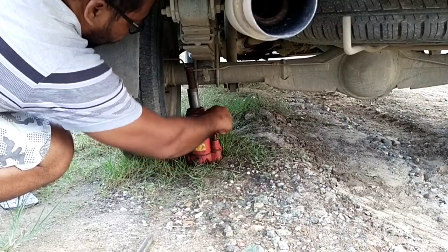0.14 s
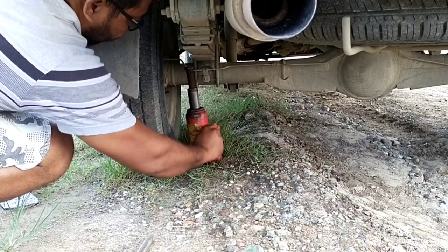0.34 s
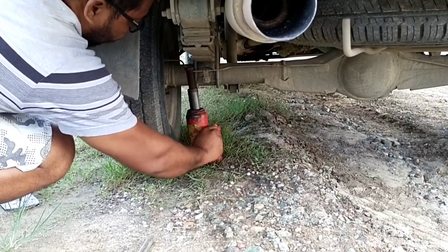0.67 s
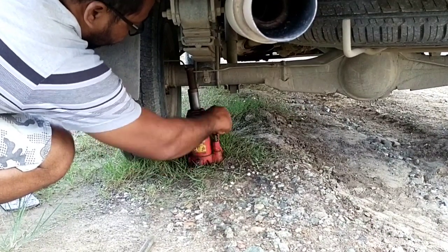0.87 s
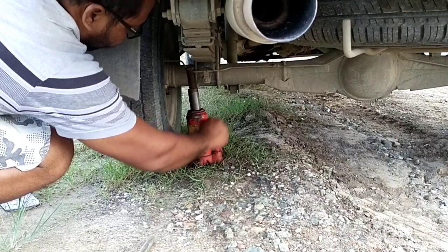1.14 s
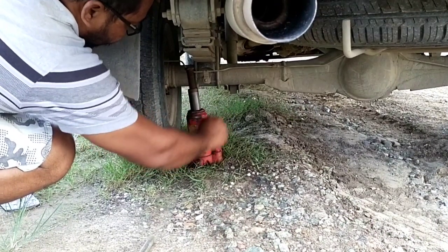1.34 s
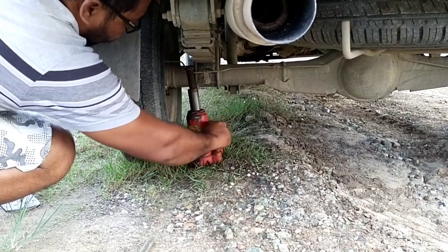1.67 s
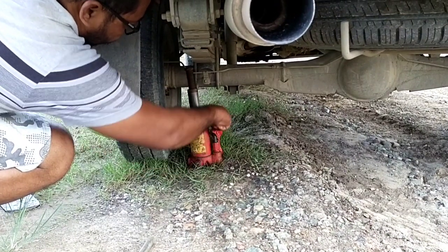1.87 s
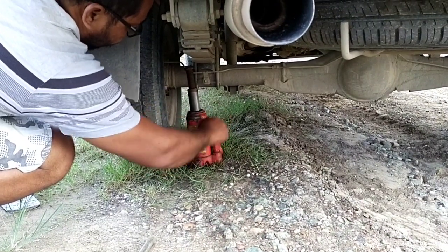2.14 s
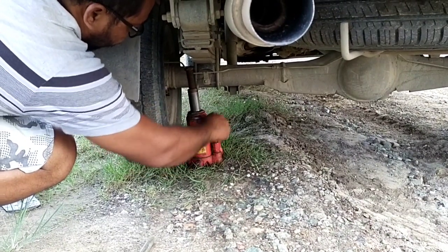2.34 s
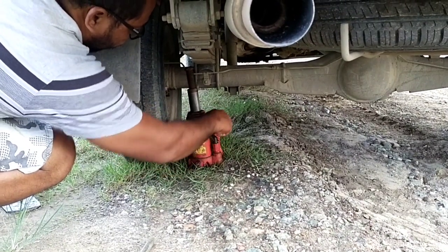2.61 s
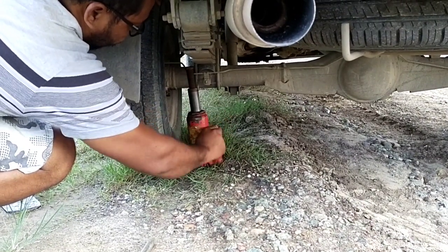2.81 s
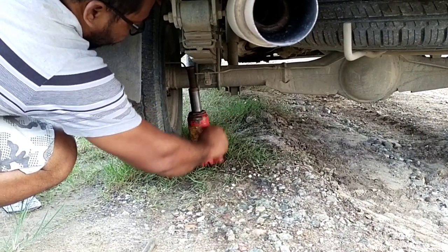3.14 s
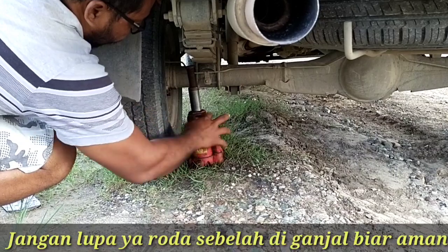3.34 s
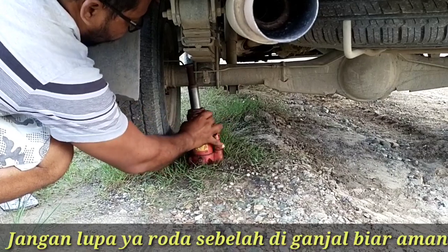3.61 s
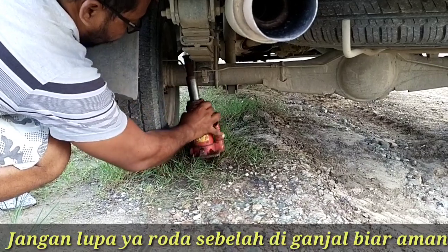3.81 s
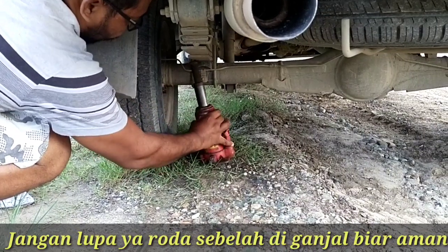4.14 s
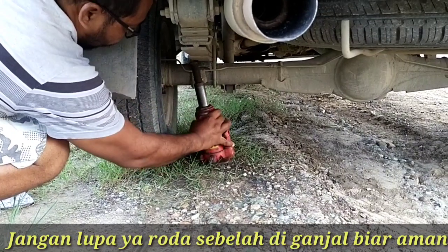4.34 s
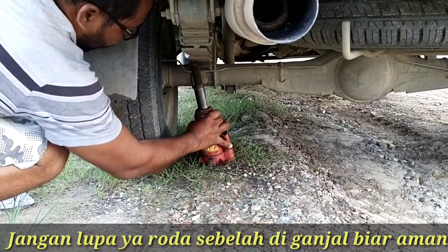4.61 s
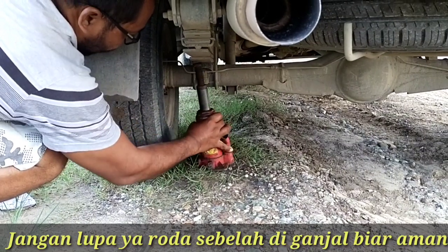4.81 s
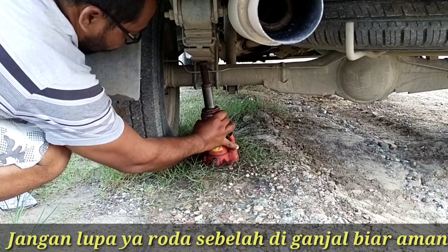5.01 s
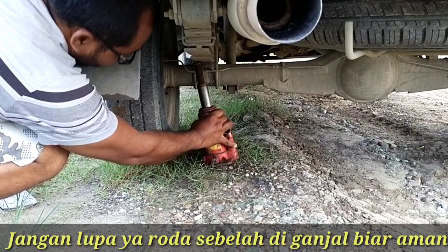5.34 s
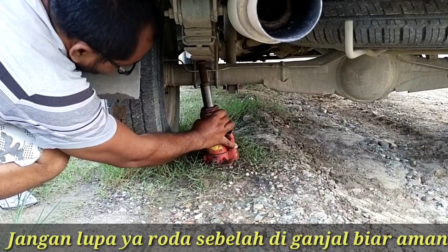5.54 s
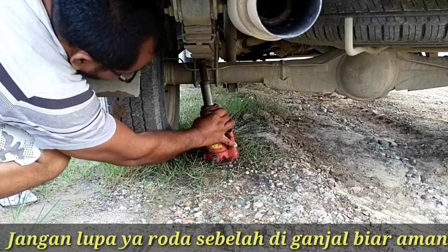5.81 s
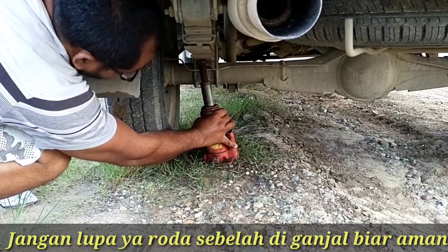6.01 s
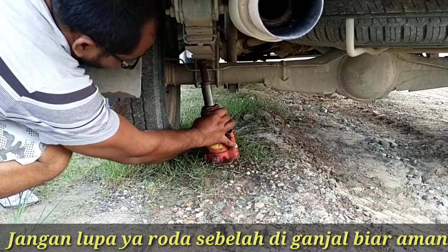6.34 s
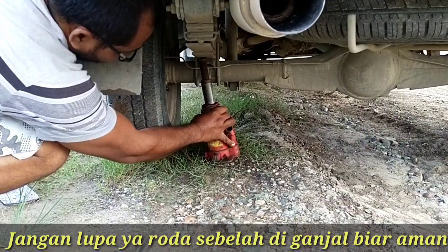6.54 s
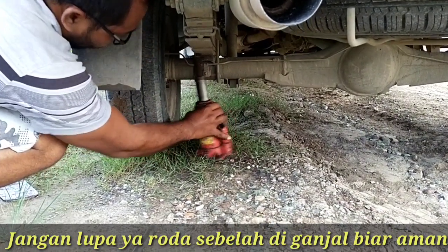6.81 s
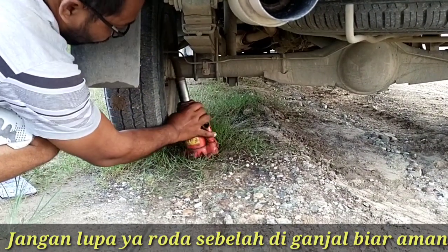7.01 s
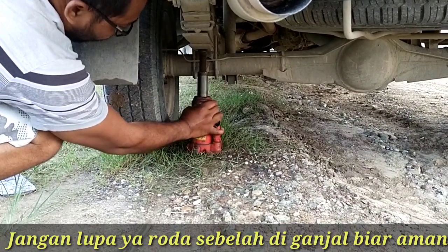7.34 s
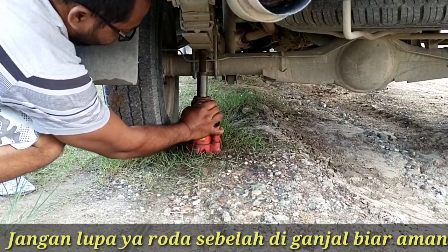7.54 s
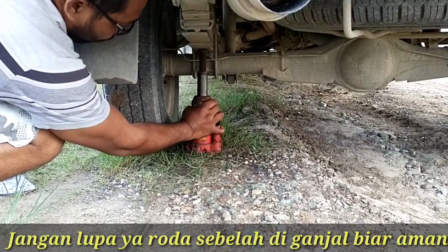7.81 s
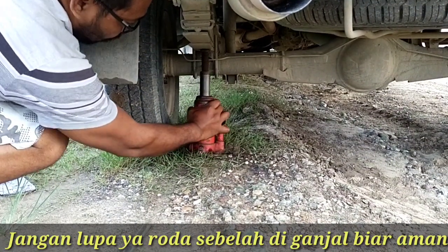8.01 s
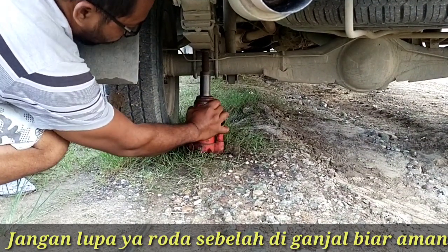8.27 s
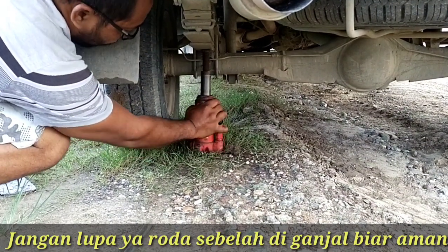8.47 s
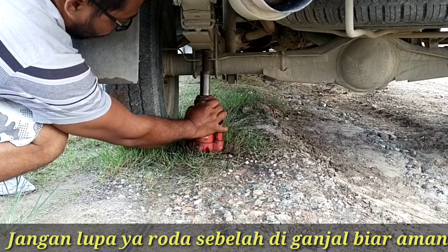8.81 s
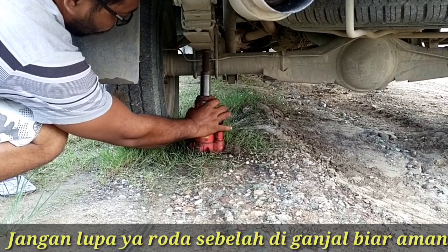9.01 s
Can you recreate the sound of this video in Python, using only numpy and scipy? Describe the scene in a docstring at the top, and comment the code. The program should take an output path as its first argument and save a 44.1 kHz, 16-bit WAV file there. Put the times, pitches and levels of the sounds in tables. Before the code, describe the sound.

A steel jack clicks as it is pumped, then scrapes and knocks against hollow metal, while a distant engine hum grows and birds chirp.

```python
"""Bottle jack under a truck

A hand-pumped steel jack rubs and clicks at each stroke. It is then shoved over grass and gravel,
squeaks, knocks and skids against the hollow axle, and groans once in stick-slip. Some way off a small
engine puffs through its exhaust, slows, then grows louder. Clothes rustle, birds chirp, insects shrill."""
import sys
import numpy as np
from scipy import signal
from scipy.fft import rfft, irfft, next_fast_len
from scipy.io import wavfile
from scipy.ndimage import map_coordinates

SR = 44100
rng = np.random.default_rng(int(sys.argv[2]) if len(sys.argv) > 2 else 0)


def inscribe(sig):
    """Save sig as 16-bit PCM at rate SR to the path in sys.argv[1].

    A 1-D sig is mono; a 2-D sig holds one channel per row.
    Samples are clipped to [-1, 1] before scaling.
    """
    pcm = np.round(np.clip(np.atleast_2d(sig).T, -1, 1) * 32767)
    wavfile.write(sys.argv[1], SR, pcm.astype(np.int16))


N = 403515
TIME = np.arange(N) / SR

# pump strokes: (start [s], length [s], rubbing level [dB])
PUMP_STROKES = [(0.028, 0.23, -52), (0.383, 0.21, -51), (0.754, 0.28, -56), (1.115, 0.23, -48.5),
                (1.513, 0.11, -57), (1.727, 0.34, -60.5), (2.122, 0.21, -55.5), (2.503, 0.25, -54.5),
                (2.869, 0.28, -54)]
# jack modes: (frequency [Hz], level [dB], t60 [s])
JACK_MODES = [(880, -14, .05), (1188, -8, .085), (1230, -5, .05), (1520, -9, .06), (1683, -10.5, .044),
              (2035, -2, .035), (2302, -4, .05), (2448, -.5, .06), (2670, -1.5, .05), (2850, -5, .05),
              (3226, -11, .08), (3865, -12, .07), (4580, -16, .06), (5960, -8, .06), (6460, -9, .05),
              (6760, -20.5, .05), (9500, -15, .08), (10570, -5.5, .046), (11300, -13.5, .05)]


def amp(db):
    """Decibels to gain."""
    return 10 ** (np.asarray(db) / 20)


def unit(x):
    """Scale to rms 1."""
    return x / np.sqrt(np.mean(x ** 2) + 1e-20)


def curves(rows):
    """Per-sample curve for each column after the time."""
    times_s, *columns = np.transpose(rows)
    return [np.interp(TIME, times_s, column) for column in columns]


def wobble(rate_hz):
    """Smooth random curve with knots at rate_hz."""
    return map_coordinates(rng.standard_normal(int(N * rate_hz / SR) + 4), [TIME * rate_hz])


def flicker(rate_hz, depth_db):
    """Random gain, limited to twice depth_db either way."""
    return amp(depth_db * np.clip(wobble(rate_hz), -2, 2))


def filtered(x, response):
    """Apply a frequency response, a function of Hz."""
    n = x.shape[-1]
    padded = next_fast_len(n + 8192)
    return irfft(rfft(x, padded) * response(np.fft.rfftfreq(padded, 1 / SR)), padded)[..., :n]


def coloured(x, points):
    """Shape by (Hz, dB) points on a log axis; rms 1."""
    points_hz, db = np.transpose(points)
    return unit(filtered(x, lambda hz: amp(np.interp(np.log(hz + 1), np.log(points_hz), db))))


def band(x, lo_hz, hi_hz, order=3):
    """Causal band-pass."""
    sos = signal.butter(order, [lo_hz, min(hi_hz, .49 * SR)], 'band', fs=SR, output='sos')
    return signal.sosfilt(sos, x)


def resonance(hz, centre_hz, width_hz):
    """Causal resonance, peak gain 1."""
    return 1j * hz * width_hz / (centre_hz ** 2 - hz ** 2 + 1j * hz * width_hz)


def stereo_noise(size, apart):
    """Common noise plus an independent part per side."""
    return unit(rng.standard_normal(size) + apart * rng.standard_normal((2, size)))


def add(track, start_s, sound):
    """Mix in at start_s."""
    part = track[:, max(round(start_s * SR), 0):][:, :sound.shape[-1]]
    part += sound[..., :part.shape[1]]


def placed(x, left_db, lag_ms):
    """Off-centre source: the left side gains left_db and trails by lag_ms."""
    side = np.array([[.5], [-.5]])
    return filtered(x, lambda hz: np.exp(-2j * np.pi * hz * lag_ms / 1000 * side)) * amp(left_db * side)


def weighted(sound, edges_hz, levels_db):
    """Place and hardness of a contact set each band's level over the first 20 ms."""
    parts = [band(sound, lo, hi) for lo, hi in zip(edges_hz, edges_hz[1:])]
    return sum((-1) ** k * amp(db) * part / np.std(part[:, :SR // 50])
               for k, (part, db) in enumerate(zip(parts, levels_db)))


def blow(modes, colour, size, crack_t60_s, crack_db, tail_t60_s, tail_db, ring_db, attack_s, detune):
    """One contact: a crack, the steel's modes, and underbody scatter with loose parts chattering."""
    t = np.arange(size) / SR
    crack = coloured(stereo_noise(size, apart=1), colour) * amp(crack_db - 60 * t / crack_t60_s)
    chatter_db = 2.5 * map_coordinates(rng.standard_normal(200), [t * 300]) * np.clip(t / .01, 0, 1)
    tail = coloured(stereo_noise(size, apart=.58), colour)
    tail *= amp(tail_db - 60 * t / tail_t60_s + chatter_db)
    hz, db, t60_s = np.transpose(modes)[:, :, None]
    strength = amp(db + rng.normal(0, 3.5, hz.shape))
    # load and grip shift each mode; each reaches the two sides in its own phase
    cycles = hz * (1 + detune * rng.standard_normal(hz.shape)) * t + rng.random(hz.shape)
    side_rad = np.array([[1], [-1]]) * rng.normal(0, .99, len(modes)) * np.minimum(hz.T / 1500, 1)
    partials = strength * amp(-60 * t / t60_s) * np.exp(2j * np.pi * cycles)
    ring = (np.exp(1j * side_rad) @ partials).real / np.linalg.norm(strength)
    return (crack + tail + amp(ring_db) * ring) * (1 - np.exp(-t / attack_s))


def jack_clicks():
    """Steel parts take up slack: light touches scuff, hard ones clack and, mid-stroke, bounce once."""
    # steel contacts: (time [s], level [dB], treble over level [dB])
    contacts = [(.072, -49, -10.5), (.089, -24.5, -15), (.154, -43, -8), (0.191, -38.5, -6),
                (.236, -51.5, -8), (.409, -42, -11.5), (.429, -47, -4), (.444, -29.5, -25.5),
                (0.521, -55.5, 1.5), (0.56, -45, -4), (0.583, -54, 4.5), (0.731, -64, 3.5),
                (.757, -46.5, 7.5), (.789, -43.5, -8.5), (0.803, -49.5, -8), (0.846, -40.5, -28.5),
                (0.903, -56, -4.5), (.931, -46.5, -6.5), (1.089, -59.5, -4.5), (1.145, -43, -13.5),
                (1.1614, -23, -7), (1.1635, -30, -1), (1.26, -56, -4.5), (1.574, -53, -14),
                (1.738, -53, -5), (1.805, -30.5, -34), (1.859, -43.5, 0.5), (1.881, -48.5, -7),
                (1.945, -51.5, 2.5), (1.983, -57, -17), (2.198, -29, -17), (2.218, -47, -20),
                (2.262, -55, -3), (2.331, -52, -30), (2.385, -56, -24), (2.44, -62, -32), (2.538, -49.5, 5),
                (2.588, -31.5, -20), (2.631, -49, -4), (2.729, -44.5, -19), (2.89, -40.5, 6),
                (2.919, -39, -12.5), (2.937, -26, -10), (3.009, -49, -16), (3.34, -57.5, -18),
                (3.722, -36, -18), (3.767, -41, -8), (4.558, -66, 2.5), (6.571, -61.5, 0.5),
                (6.649, -48, 3), (6.903, -62, -6), (6.932, -33, -21), (8.201, -60, -6), (8.243, -44, -24)]
    # contact noise spectrum: (frequency [Hz], level [dB])
    colour = [(210, -57.5), (350, -22), (550, -15.5), (974, -13), (1180, -1), (1430, -9), (1650, -16),
              (2150, -9), (2670, 0), (2980, -12), (3390, -8), (5060, -19.5), (5840, -14.5), (8710, -14.5),
              (10900, -15), (13900, -21), (16000, -32)]
    hard_db, bounce_s = -36, .056
    opening_ticks = [(s, db + 4, -5.5) for s, _, db in PUMP_STROKES]
    bounces = [(s + bounce_s, -50.5, -9.5) for s, db, _ in contacts
               if db > hard_db and any(0 < s - start_s < length_s for start_s, length_s, _ in PUMP_STROKES)]
    out = np.zeros((2, N))
    for s, db, treble_db in contacts + opening_ticks + bounces:
        levels_db = db + np.array([-16, 0, -.5 + .48 * treble_db, treble_db])
        attack_s = np.interp(max(levels_db), [-48, -34], [.0028, .0004])
        scuff_t60_s = np.interp(max(levels_db), [-48, -34], [.03, .019])
        # each contact point wakes its own high modes
        overtones = [(hz, -13, .045) for hz in rng.uniform(3000, 13000, 24)]
        click = blow(JACK_MODES + overtones, colour, size=SR // 8, crack_t60_s=scuff_t60_s, crack_db=2,
                     tail_t60_s=.13, tail_db=-18, ring_db=-2.5, attack_s=attack_s, detune=.021)
        add(out, s, weighted(click, (300, 1500, 4500, 8500, 16000), levels_db))
    return placed(out * amp(-1.5), left_db=1, lag_ms=.03)


def jack_knocks():
    """The jack bumps ground and hollow axle, whose low modes swell last and ring longest."""
    # bumps: (time [s], thump [dB], body [dB], edge [dB], added damping [dB/s], hollow pitch [Hz])
    bumps = [(.251, -73, -63, -67, 100, 800), (1.705, -59, -65, -80, 50, 500),
             (2.112, -68, -59, -66, 82, 550), (2.379, -54, -59.5, -68, 64, 400),
             (2.52, -66, -55, -67, 103, 600), (3.458, -46.5, -50.5, -73, 5, 700),
             (3.71, -56, -44, -67, 33, 1300), (3.724, -40, -37.5, -46.5, 20, 620),
             (3.747, -37, -42, -31, 25, 170), (4.112, -37, -40, -72, -3, 1030),
             (4.487, -48, -56, -66, 110, 600), (4.637, -36, -35.5, -56, 5, 1100),
             (5.302, -52.5, -62, -68, 18, 600), (6.93, -32.5, -32, -45.5, 20, 1480),
             (7.701, -31, -48.5, -57, 60, 1000), (8.227, -53, -44, -69, 150, 1500),
             (8.244, -27, -39, -59, 48, 1500)]
    # axle modes: (frequency [Hz], level [dB], t60 [s])
    axle_modes = [(198.6, -.5, .43), (240.7, 6.5, .34), (295, 0, .25), (382, -9, .36), (522, -8, .3),
                  (600, -5, .2), (668, -9, .24), (841, 0, .14), (1003, -1, .22), (1120, 0, .09),
                  (1227, -5, .2), (1300, 3, .14), (1400, -12, .35), (1464, 2, .15), (1690, 1, .07),
                  (1841, -6, .11), (2810, 1.5, .1)]
    # bump noise spectrum: (frequency [Hz], level [dB])
    colour = [(60, -4), (120, -5), (240, 3), (380, -6), (560, -4.5), (1000, -12.5), (1600, -13),
              (2200, -20.5), (3100, -14.5), (5000, -19), (9000, -19), (15000, -40)]
    out, t = np.zeros((2, N)), np.arange(SR * 2 // 5) / SR
    rise_s = .02  # the heavy axle is slow to move
    swell_db = 20 * np.log10(1 - np.exp(-(t + 1 / SR) / rise_s))
    for s, thump_db, body_db, edge_db, damping_db_per_s, hollow_hz in bumps:
        clank_db = body_db - .5 + .27 * (edge_db - body_db)
        levels_db = thump_db + swell_db, body_db, clank_db, edge_db
        knock = blow(axle_modes, colour, size=len(t), crack_t60_s=.05, crack_db=0,
                     tail_t60_s=.33, tail_db=-7, ring_db=-3, attack_s=.0018, detune=.008)
        # each contact point favours one region of modes
        knock = filtered(knock, lambda hz: 1 + amp(5) * resonance(hz, hollow_hz, .45 * hollow_hz))
        # treble dies first; bass reaches both sides alike
        knock = band(knock, 120, 1500) + band(knock, 1900, 20000) * amp(-60 * t / .19)
        knock += band(knock.mean(0) - knock, 60, 380, order=1)
        knock *= amp(-damping_db_per_s * t)
        add(out, s, weighted(knock, (100, 400, 1800, 5000, 16000), levels_db))
    return placed(out * amp(.95), left_db=.8, lag_ms=.055)


def friction(colour, slips_per_s, spread_db, hiss_db):
    """Tiny slips of uneven size over a smooth hiss."""
    slips = (rng.random(N) < slips_per_s / SR) * amp(spread_db * np.clip(rng.standard_normal(N), -2, 2))
    return coloured(unit(slips) + amp(hiss_db) * stereo_noise(N, apart=.27), colour)


def pump_slide():
    """Steel rubs on steel in each stroke; clumps of slips set the jack ringing."""
    # rubbing spectrum: (frequency [Hz], level [dB])
    colour = [(240, -51), (400, -15), (598, -15.5), (1180, -10.5), (1350, -19.5), (1820, -13.5),
              (2400, -4.5), (3310, -12), (6540, -7.5), (11400, -22), (15000, -26), (16000, -30.5)]
    pressure = np.zeros(N)
    for start_s, length_s, db in PUMP_STROKES:
        knots_s = start_s + np.array([-.005, .003, length_s - .04, length_s + .018])
        pressure += amp(db) * np.interp(TIME, knots_s, [.013, 1, .25, .0023])
    rub = friction(colour, slips_per_s=900, spread_db=4, hiss_db=-1)
    ring = filtered(rub, lambda hz: sum(resonance(hz, f, 2.2 / t60_s) for f, _, t60_s in JACK_MODES))
    clumps = flicker(rate_hz=90, depth_db=2.8)
    return placed((rub + amp(-13) * unit(ring)) * pressure * clumps, left_db=4, lag_ms=.073)


def squeaks():
    """Steel catches on steel and sings briefly in two modes under an unsteady grip."""
    # catches: (time [s], length [s], pitch [Hz], level [dB])
    catches = [(1.156, .01, 6800, -39), (3.685, .025, 6700, -33), (3.721, .02, 2880, -24),
               (3.766, .007, 3300, -28), (3.768, .028, 7600, -45), (5.286, .009, 3250, -46),
               (5.299, .009, 3250, -40)]
    out = np.zeros((2, N))
    for s, length_s, hz, db in catches:
        progress = np.arange(int(length_s * SR)) / (length_s * SR)
        waver, flutter = (map_coordinates(rng.standard_normal(22), [progress * 20]) for _ in range(2))
        phase = 2 * np.pi * np.cumsum(hz * (1 + .018 * waver)) / SR
        grip = np.interp(progress, [0, .12, .7, 1], [0, .5, .38, .1]) * (1 + .25 * flutter)
        add(out, s, amp(db) * grip * (np.sin(phase) + amp(-16) * np.sin(1.56 * phase)))
    return placed(out, left_db=9.5, lag_ms=.021)


def ram_skid():
    """The ram breaks loose and scrapes the axle: a short, bright rasp."""
    # scrape: (start [s], hardest [s], end [s], level [dB])
    scrape = (3.738, 3.751, 3.785, -35)
    # rasp spectrum: (frequency [Hz], level [dB])
    colour = [(800, -25), (3000, -6), (5000, -5), (6700, 0), (8500, -4), (10500, 0), (14000, -5),
              (16000, -12)]
    start_s, peak_s, end_s, db = scrape
    knots_s = [start_s - .002, start_s, peak_s - .005, peak_s, peak_s + .005, end_s, end_s + .02]
    pressure = amp(np.interp(TIME, knots_s, [-120, -8, -7, 2, -8, -20, -120]))
    rasp = friction(colour, slips_per_s=2500, spread_db=4, hiss_db=-2)
    return placed(rasp * pressure * amp(db), left_db=6, lag_ms=.03)


def groan():
    """Loaded steel sticks and slips unevenly, driving the hollow metal's resonances."""
    # stick-slip spell: (start [s], length [s], level [dB])
    spell = (4.99, 0.13, -48)
    # body resonances: (frequency [Hz], width [Hz], level [dB])
    modes = [(220, 76, 6.5), (610, 36, 11), (680, 25, -3), (770, 12, 7), (1090, 63, -19), (1640, 87, -2)]
    start_s, length_s, level_db = spell
    slips_per_s = 90 * np.exp(.3 * wobble(80))
    slips = np.diff(np.floor(np.cumsum(slips_per_s) / SR), prepend=0)
    pressure = np.interp(TIME - start_s, [0, .015, length_s - .035, length_s], [0, 1, 1, 0])
    push = (unit(slips) + 1.3 * stereo_noise(N, apart=.53)) * pressure
    body = filtered(push, lambda hz: sum(amp(db) * resonance(hz, f, width) for f, width, db in modes))
    return amp(level_db) * unit(band(body, 180, 950, order=4)) * np.sqrt(np.mean(pressure ** 2))


def grass():
    """The base swishes through tufts; each drag swells and fades."""
    # drags: (peak time [s], level [dB], 30 dB rise [s], 30 dB fall [s])
    drags = [(3.747, -37.5, 0.08, 0.11), (4.39, -49.5, 0.13, 0.26), (4.662, -46, 0.034, 0.19),
             (5.03, -63, .09, .2), (6.139, -63, .12, 0.17), (6.637, -49.5, 0.18, 0.15),
             (7.69, -55, 0.088, 0.097), (7.785, -54.5, 0.034, 0.17), (8.22, -52.5, 0.075, 0.27)]
    # swish spectrum: (frequency [Hz], level [dB])
    colour = [(240, -38), (400, -16.5), (921, -8), (1060, -8), (1380, -9.5), (3310, -4), (5110, -11.5),
              (8760, -10.5), (13700, -26.5), (16000, -39)]
    envelope = sum(amp(db - 30 * np.maximum((s - TIME) / rise_s, (TIME - s) / fall_s))
                   for s, db, rise_s, fall_s in drags)
    swish = friction(colour, slips_per_s=700, spread_db=5, hiss_db=1)
    return placed(swish * flicker(rate_hz=110, depth_db=1.8) * envelope, left_db=3.5, lag_ms=.037)


def gravel():
    """Stones grind under the base, each a dull tick of its own pitch and size."""
    # gravel giving way: (start [s], length [s], level [dB])
    crunches = [(4.415, 0.05, -62), (4.655, 0.079, -51), (6.569, 0.12, -58.5)]
    grains_per_s, centre_hz, ring_cycles = 280, 1130, 3.2
    out, t = np.zeros((2, N)), np.arange(SR // 50) / SR
    for start_s, length_s, db in crunches:
        grains = np.zeros((2, int(length_s * SR) + len(t)))
        for when, pitch, size in rng.random((int(grains_per_s * length_s), 3)):
            hz = centre_hz * np.exp(1.24 * (pitch - .5))
            tick = np.sin(2 * np.pi * hz * t) * np.exp(-2 * hz * t / ring_cycles)
            add(grains, when * length_s, amp(14 * size) * tick)
        add(out, start_s, amp(db) * unit(grains))
    return placed(out, left_db=2.5, lag_ms=.034)


def soft_tap():
    """A soft tap leaves one faint tone."""
    # dull ring: (time [s], pitch [Hz], level [dB])
    ring = (5.602, 662, -61)
    start_s, hz, db = ring
    t = np.maximum(TIME - start_s, 0)
    tone = np.sin(2 * np.pi * hz * t) * np.exp(-np.minimum(t / .095, 3) ** 4)
    tap = unit(band(stereo_noise(N, apart=.413), 534, 900)) * amp(-60 * t / .083) * (t > 0)
    return amp(db) * (tone + 1.2 * tap)


def reflections(x, t60_s, level_db):
    """Ground and walls return a dull, diffuse tail."""
    t = np.arange(SR) / SR
    tail = band(stereo_noise(SR, apart=.6), 300, 800, order=2)
    tail *= amp(-60 * t / t60_s) * (1 - np.exp(-t / .04))
    return amp(level_db) * signal.fftconvolve(x, tail / np.linalg.norm(tail[0]), axes=1)[:, :N]


def engine():
    """One puff per firing rings the exhaust; distance leaves only the bass."""
    # engine speed: (time [s], firing rate [Hz])
    speed = [(0.0, 30.54), (1.5, 24.41), (2.2, 21.89), (3.2, 18.93), (4.2, 22.38), (4.85, 20.31),
             (5.3, 21.04), (5.6, 20.82), (5.95, 21.98), (6.45, 22.93), (6.75, 22.87), (7.9, 24.72),
             (9.15, 24.81)]
    # exhaust boom: (time [s], level [dB])
    boom_levels = [(0, -47), (1.5, -51), (2.0, -64), (2.7, -73.5), (3.1, -62.5), (3.5, -60.5), (4.05, -56),
                   (4.3, -46.5), (4.75, -46.5), (4.95, -57.5), (5.4, -47), (6.4, -40), (9.15, -35.5)]
    # upper exhaust resonance: (time [s], level relative to boom curve [dB])
    upper_levels = [(1.3, -32), (2.5, -13), (3.4, -17), (4.1, -6), (6.5, -12.5), (7.2, -12.5), (9.15, -8)]
    (firing_hz,), (boom_db,), (upper_db,) = curves(speed), curves(boom_levels), curves(upper_levels)
    fired = np.flatnonzero(np.diff(np.floor(np.cumsum(firing_hz) / SR + .96)))
    # off throttle: uneven puffs, lower boom; steadier under load
    load = np.interp(TIME, [4.5, 7.5], [0, 1])
    puffs = np.zeros(N)
    puffs[fired] = amp((3 - 2.5 * load[fired]) * rng.standard_normal(len(fired)))
    puffs = unit(puffs) + .07 * rng.standard_normal(N)
    coasting = unit(band(filtered(puffs, lambda hz: resonance(hz, 103.4, 14)), 83.3, 144, order=4))
    pulling = unit(band(filtered(puffs, lambda hz: resonance(hz, 114.1, 15.5)), 87.3, 176.3, order=4))
    boom = np.sqrt(load) * pulling - np.sqrt(1 - load) * coasting
    upper = filtered(puffs, lambda hz: resonance(hz, 239.2, 24) - .81 * resonance(hz, 204.6, 28))
    upper = unit(band(upper, 165, 280, order=4))
    return placed(amp(boom_db) * (amp(2) * boom + amp(upper_db) * upper), left_db=1.43, lag_ms=.033)


def birds():
    """Runs of raspy falling chirps, never quite alike, smeared by distance."""
    # runs: (start [s], end [s], period [s], note length [s], level [dB], fade [dB/s], pitch [Hz])
    songs = [(1.242, 2.1, .159, .03, -52, 1, 3050), (2.675, 3.85, .138, .028, -53, 0, 3130),
             (3.095, 3.68, .166, .03, -51, 0, 3400), (3.985, 4.05, .166, .03, -53, 0, 3400),
             (4.855, 6.5, .156, .03, -59, 7, 3130), (5.375, 6.55, .26, .06, -72, 0, 5250),
             (7.088, 7.84, .136, .034, -51.5, 4, 3050), (7.9, 9.05, .262, .06, -72, 0, 5200)]
    fall_share, echo_t60_s, echo_rise_s = .15, .16, .012
    notes = [(s, length_s, db - fade * (s - start_s) + rng.normal(0, 1), hz * (1 + rng.normal(0, .015)))
             for start_s, end_s, period_s, length_s, db, fade, hz in songs
             for s in np.arange(start_s, end_s, period_s)]
    out, t = np.zeros((2, N)), np.arange(SR // 5) / SR
    for s, length_s, db, hz in notes:
        progress = np.clip(t / length_s, 0, 1)
        rasp = 1 + 2.2 * map_coordinates(rng.standard_normal(190), [t * 900])
        phase = 2 * np.pi * np.cumsum(hz * (1 + fall_share * (.5 - progress))) / SR
        chirp = rasp * np.sin(np.pi * progress) * np.sin(phase)
        echo = stereo_noise(len(t), apart=1) * amp(-60 * t / echo_t60_s) * (1 - np.exp(-t / echo_rise_s))
        smeared = signal.fftconvolve(chirp[None], echo / np.linalg.norm(echo[0]), axes=1)
        add(out, s - .012, amp(db - 9.5) * smeared)
    return out


def rustle():
    """Hand and clothes shift in faint, uneven patches."""
    # rustling: (time [s], level [dB])
    levels = [(1.5, -74.5), (3.3, -76), (5.3, -75.5), (5.8, -81), (6.2, -71.5), (7.4, -73.5), (9, -78.5)]
    # cloth spectrum: (frequency [Hz], level [dB])
    colour = [(150, -20), (450, 2.5), (800, -9), (1150, -4.5), (1800, -9.5), (3200, -7), (5000, -22.5),
              (14000, -32.5)]
    level_db, = curves(levels)
    spectra = signal.stft(stereo_noise(N, apart=.6), nperseg=1024)[2]
    blur = np.outer(np.hanning(9), np.hanning(11))
    patches = unit(signal.convolve2d(rng.standard_normal(spectra.shape[1:]), blur, 'same'))
    cloth = signal.istft(spectra * amp(6.5 * np.clip(patches, -2, 2)), nperseg=1024)[1][:, :N]
    return coloured(cloth, colour) * amp(level_db + 2 * wobble(12))


def insect(hz):
    """A thin, wavering tone that swells in quick bursts."""
    phase = 2 * np.pi * np.cumsum(hz + 60 * wobble(35) + 110 * wobble(500)) / SR
    bursts = amp(5 * np.clip(wobble(30), -2, 1.5))
    return unit(bursts * np.array([np.sin(phase + wobble(60)) for _ in range(2)]))


def twitter(lo_hz, hi_hz, rate_hz, depth_db):
    """A narrow band of far song that comes and goes."""
    return unit(band(stereo_noise(N, apart=4.1), lo_hz, hi_hz, order=2) * flicker(rate_hz, depth_db))


def outdoors():
    """Still air, far rumble, insects and far birds."""
    # air spectrum: (frequency [Hz], level [dB])
    air_colour = [(12, -54.5), (20, -27), (38, -16), (77, 1.5), (107, -6.5), (172, -4.5), (759, -28.5),
                  (1760, -35), (3160, -40), (4810, -47), (6180, -37), (7110, -30), (8180, -35.5),
                  (14300, -45.5), (16000, -67.5)]
    # far rumble: (time [s], level [dB])
    rumble_levels = [(1.2, -62.5), (2.3, -74.5), (3.3, -74.5), (4.1, -56), (6.5, -53)]
    # far birds: (time [s], level near 3 kHz [dB], level near 4 kHz [dB])
    song_levels = [(1, -78, -85.5), (3, -74.5, -85), (5.2, -83.5, -78), (5.8, -80.5, -85.5),
                   (7.3, -80.5, -78.5), (8.6, -76.5, -79), (9.15, -93, -81)]
    # insect chorus: (time [s], level [dB])
    insect_levels = [(3, -73.5), (6, -71.5)]
    # one per insect: (pitch [Hz])
    pitches_hz = [7030, 7160, 7380]
    (rumble_db,), (insects_db,) = curves(rumble_levels), curves(insect_levels)
    low_db, high_db = curves(song_levels)
    air = coloured(stereo_noise(N, apart=1), air_colour)
    air = unit(band(air, 410, 15000, order=1)) * amp(-71 + .5 * wobble(3))
    rumble = coloured(stereo_noise(N, apart=.13),
                      [(20, -20), (55, -8), (90, 1), (150, 5), (300, -10), (600, -38.5), (2000, -63.5)])
    insects = unit(sum(insect(hz) for hz in pitches_hz))
    insects += amp(-13.5) * twitter(8700, 9400, rate_hz=12, depth_db=-2)
    far_birds = amp(low_db) * twitter(2400, 3500, rate_hz=14, depth_db=5)
    far_birds += amp(high_db) * twitter(4080, 4350, rate_hz=6, depth_db=5)
    return air + rumble * amp(rumble_db) + far_birds + insects * amp(insects_db)


def treble_left(x, db_per_khz):
    """High notes lean to the left."""
    return filtered(x, lambda hz: amp(db_per_khz * hz / 1000 * np.array([[.5], [-.5]])))


def scene():
    """The mix, heard from beside the truck."""
    knocks = jack_knocks()
    jack = treble_left(jack_clicks() + pump_slide() + grass(), db_per_khz=.37)
    jack += squeaks() + ram_skid() + gravel() + knocks + reflections(knocks, t60_s=.75, level_db=-29)
    return jack + groan() + soft_tap() + rustle() + engine() + birds() + outdoors()


def record(dry):
    """Brick-wall low-pass at 16.1 kHz."""
    return filtered(dry, lambda hz: hz < 16100)


dry = scene()
out = record(dry)
inscribe(out)
```